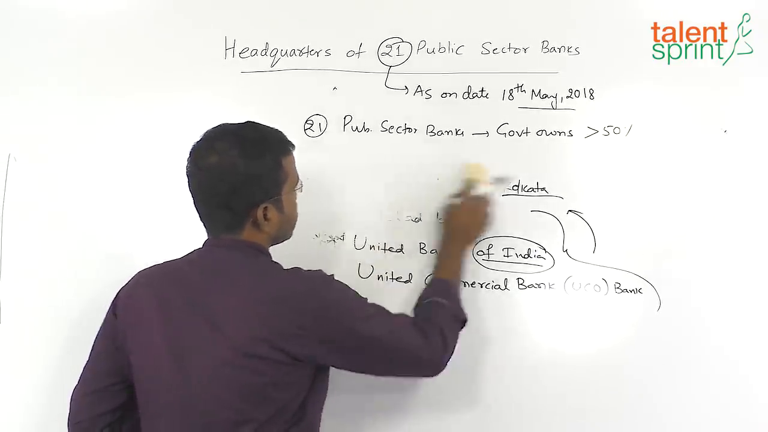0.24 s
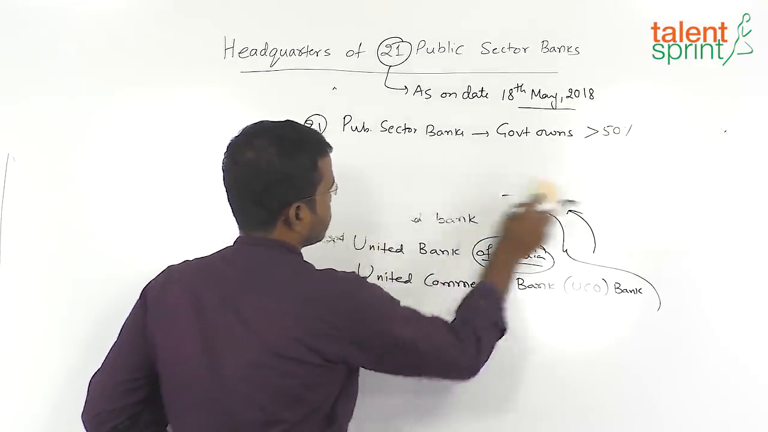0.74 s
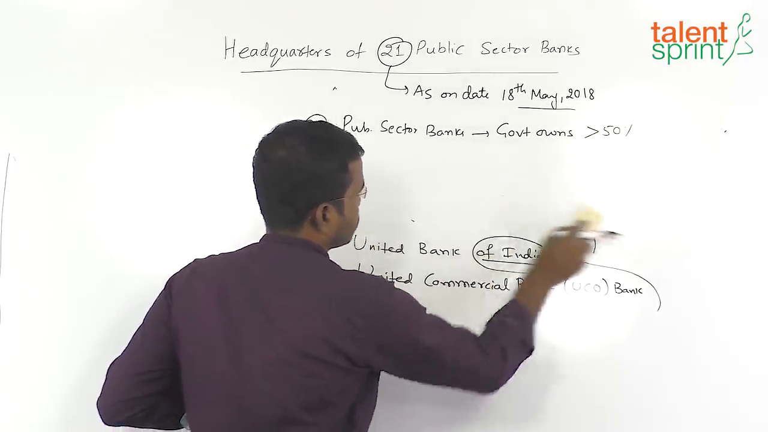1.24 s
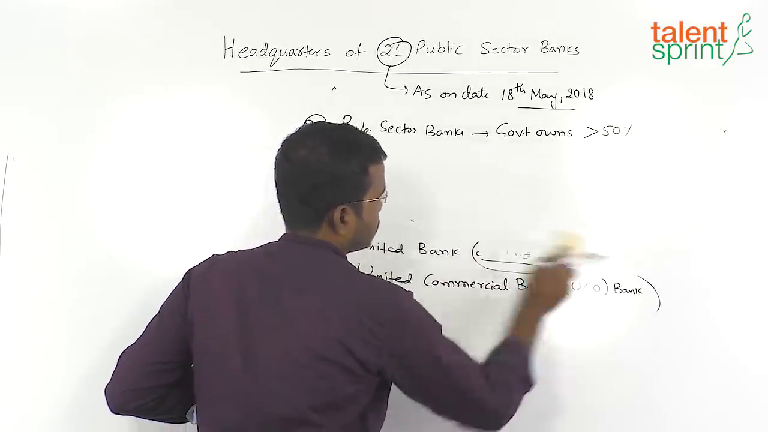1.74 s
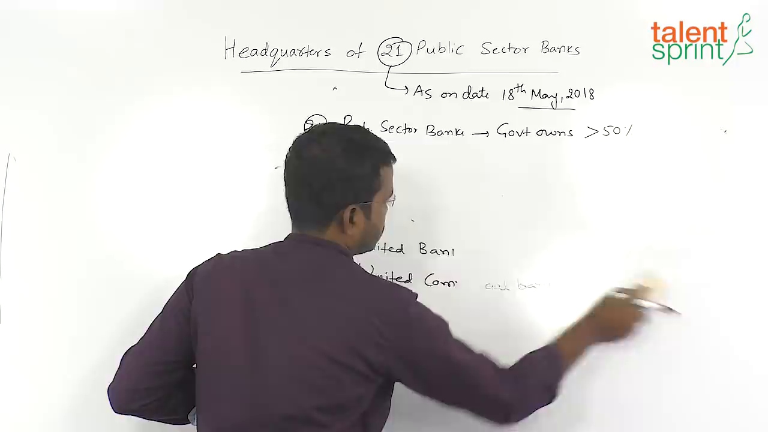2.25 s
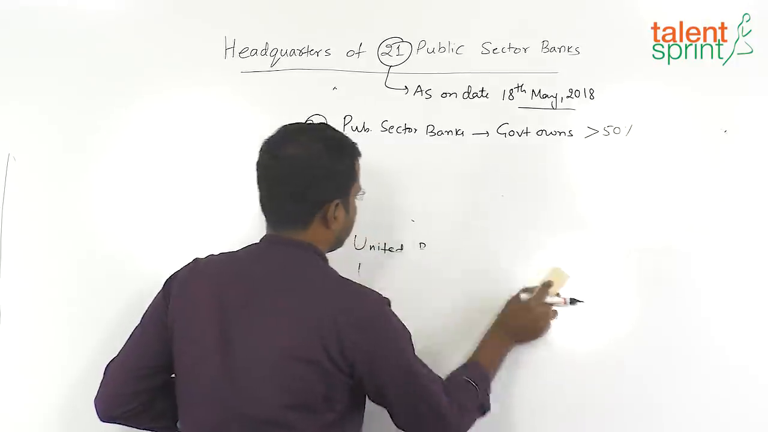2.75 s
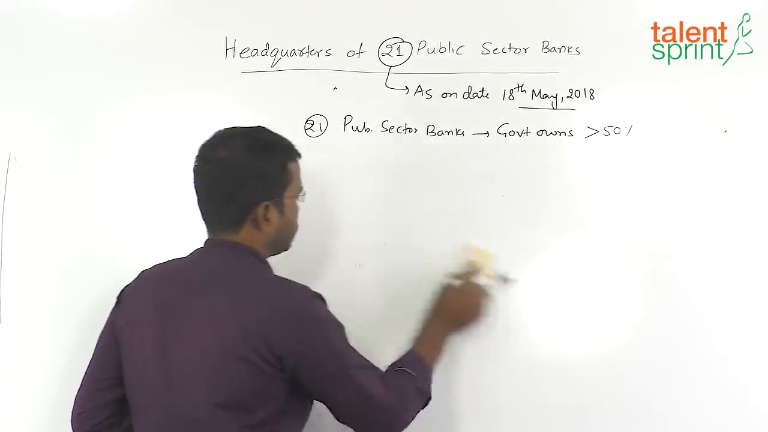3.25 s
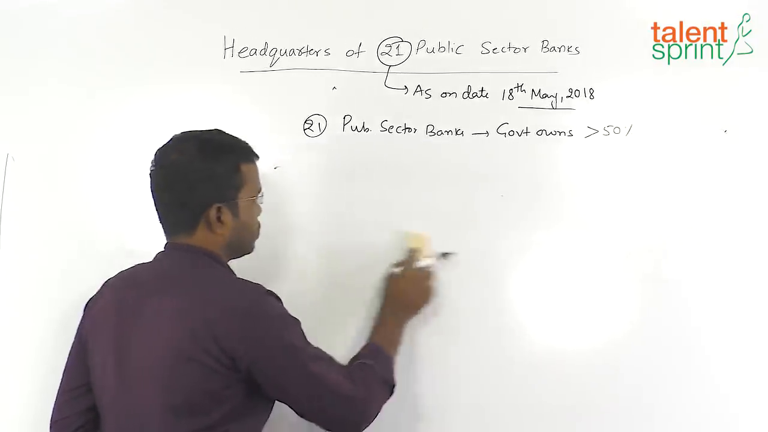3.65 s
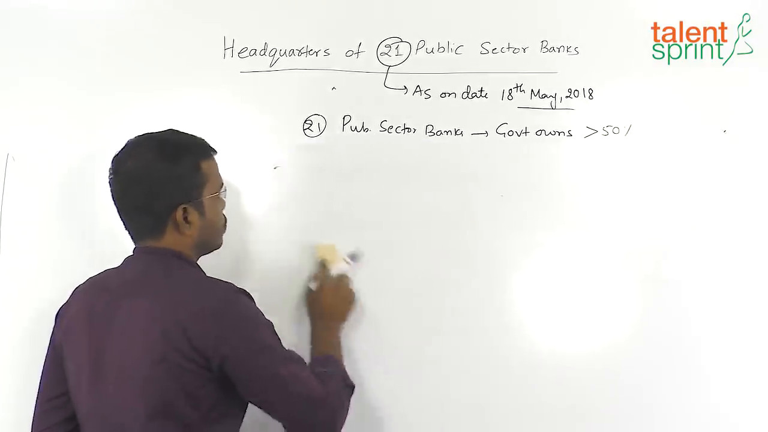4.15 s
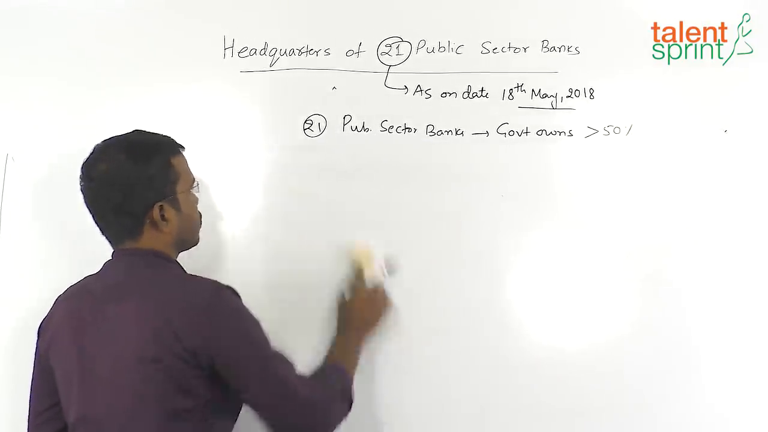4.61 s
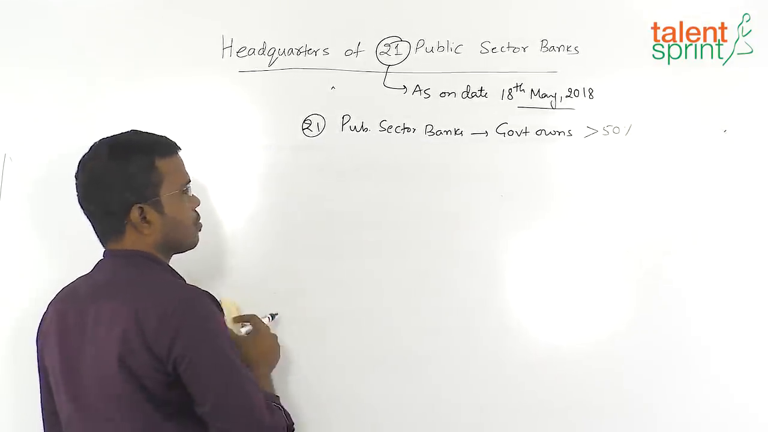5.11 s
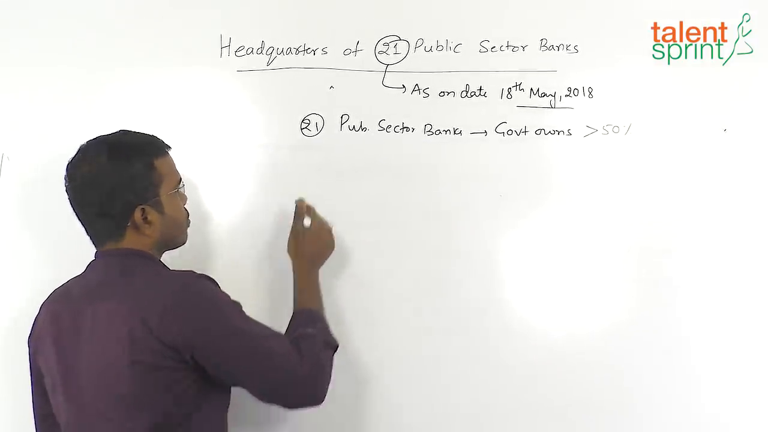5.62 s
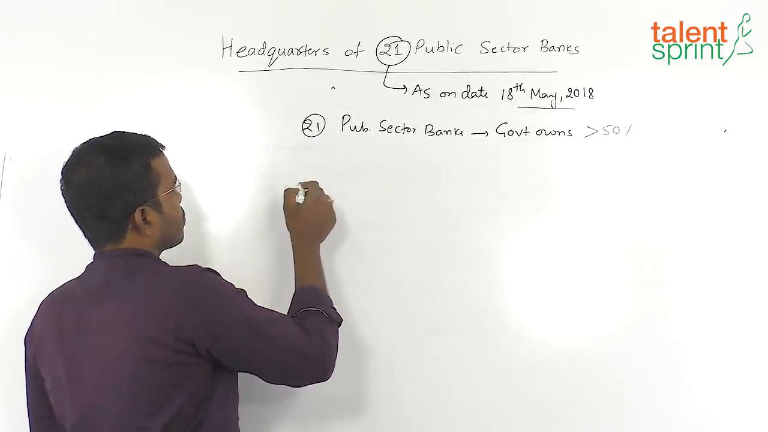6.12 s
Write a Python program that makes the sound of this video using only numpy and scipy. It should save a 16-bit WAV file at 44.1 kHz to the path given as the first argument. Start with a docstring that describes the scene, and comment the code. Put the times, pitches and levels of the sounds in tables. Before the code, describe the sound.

Quick hissing strokes wipe a whiteboard, then a brief rustle follows, over a fan's low rush and soft thumps from a draught.

```python
"""Wiping a classroom whiteboard

A felt eraser hisses back and forth over the board, stopping for an instant at each turn. It is laid
aside with a rustle and a tick, and a marker starts to write. A draught buffets the close microphone
in dull low bumps; behind it all a fan fills the room."""
import sys
import numpy as np
from scipy import signal
from scipy.fft import rfft, irfft, next_fast_len
from scipy.io import wavfile
from scipy.ndimage import uniform_filter1d, map_coordinates

SR = 44100
rng = np.random.default_rng(int(sys.argv[2]) if len(sys.argv) > 2 else 0)


def put_to_file(sound):
    """Save the sound as 16-bit audio at rate SR, in the file named by the first command-line argument."""
    columns = np.atleast_2d(sound).T  # one column per channel
    safe = np.clip(columns, -1, 1)
    whole_steps = np.round(safe * 32767)
    wavfile.write(sys.argv[1], SR, whole_steps.astype(np.int16))


N = 280917

LIFT_S, LIFT_DB_PER_S = 4.85, 120  # the felt leaves the board
DRIFT_DB, DRIFT_HZ = 1.36, 100  # chance changes of grip
DULL, DULL_S = 0.91, 0.019  # slow felt loses treble first: extra dB per dB of halt, and its reach
RESTART = 1.16  # each halt is this much quicker going in and this much slower coming out
# The eraser block ringing in the hand. Each row: pitch in Hz, width in Hz, relative level in dB.
BLOCK_MODES = [(3020, 1010, 23), (1830, 3600, -36)]
# The grip lets the block ring more or less. Each row: time and half width in seconds, change in dB.
GRIP_PRESSES = [(2.54, .04, 3.5), (3.04, 0.035, 5.5), (3.2, 0.054, -5), (3.1, 0.051, -3.5), (0.46, .03, 7)]
# The bright edge of stiff fibres. Each row: frequency in Hz, relative level in dB.
EDGE_SPECTRUM = [(7000, -7), (8600, -3), (9400, 3), (10600, -2.5), (11100, -29), (13000, -54)]
# The fizz at the top of the hiss. Each row: frequency in Hz, relative level in dB.
FIZZ_SPECTRUM = [(8000, -56), (10800, 2), (11500, 1), (13000, -1), (16000, -6)]
# The hand reversing at the board, near the microphone. Each row: time in seconds, depth of the halt
# in dB, its half width in seconds, hiss level in dB, swell of the next stroke in dB, hiss centre and
# hollow centre in Hz, then block ring, hollow rub, bright edge and fizz in dB relative to the hiss.
HAND_TURNS = [(-.02, 8, .012, -35.5, 1, 7600, 4050, -15, -12, -12, -16),
              (.265, 15, 0.014, -45, -2, 6100, 3700, -2, -24, -8, -17),
              (.463, 9.5, .012, -38, -2, 6500, 3850, -13, -13, -6.5, -15),
              (.75, 16, 0.015, -45.5, -1, 6400, 3670, -11, -8, -7, -15),
              (.99, 10.5, 0.011, -38.5, -0.5, 6300, 4100, -11.5, -14, -11, -15),
              (1.269, 15, 0.023, -44, -1, 6900, 3880, -3, -17, -6, -14),
              (1.482, 6.5, 0.0081, -38.5, 2.5, 6550, 4400, -10.5, -20, -11.5, -17),
              (1.716, 14, 0.019, -46.5, -3.5, 6800, 4200, -5, -10, -5, -15),
              (1.952, 12, 0.0079, -34, 1.5, 7200, 4470, -10.5, -16, -15.5, -15),
              (2.253, 11, .013, -47.5, -3, 6800, 4340, -3, -18, -5.5, -14),
              (2.576, 23.5, 0.013, -31, -0.5, 6700, 3930, -11, -9, -11, -11.5),
              (2.829, 8, 0.008, -41.5, 0, 6450, 4500, -10.5, -18, -20.5, -15),
              (3.118, 10.5, 0.025, -36, 2, 7100, 3730, -2, -6, -2, -12),
              (3.37, 22, 0.0071, -45, -0.5, 5800, 4600, -13, -16, -16, -15),
              (3.585, 10.5, 0.014, -33.5, -3.5, 6400, 3850, -12.5, -12, -8, -13),
              (3.772, 25, 0.0059, -42.5, 1.5, 5600, 4850, -13, -10, -10, -11),
              (4.088, 12, .014, -43.5, 1.5, 5950, 4550, -14, -4, -7.5, -9),
              (4.489, 16, 0.013, -42, 5, 6650, 4500, -9.5, -3.5, -9.5, -18),
              (4.87, 4.5, .02, -51.5, -4, 6000, 4530, -10.5, -4, -4.5, -7)]


def eraser():
    """Felt rubs the board; its hiss glides with grip and place and drops as the hand halts at each turn."""
    f, t, slips = grit(rough_db=0.0, patchy_db=1.5)
    turns = np.array(HAND_TURNS)
    gliding = np.delete(turns, [1, 2, 4], axis=1)  # all but the halt and the swell
    hiss_db, centre_hz, hollow_hz, block_db, hollow_db, edge_db, fizz_db = curves(gliding, t)
    stroke = np.interp(t, turns[:, 0], np.arange(len(turns)))
    hiss_db += turns[stroke.astype(int), 4] * np.sin(np.pi * stroke) ** 2
    hiss_db -= LIFT_DB_PER_S * np.clip(t - LIFT_S, 0, None)
    halt_db = sum(db * bump(t, s, width * np.where(t > s, RESTART, 1 / RESTART))
                  for s, db, width in turns[:, :3])
    dull_db = DULL * sum(db * np.exp(-np.abs(t - s) / DULL_S) for s, db in turns[:, :2])
    centre_hz += DRIFT_HZ * wobble(14, t)
    hollow_hz += DRIFT_HZ * wobble(16, t)
    block_db += sum(db * bump(t, s, width) for s, width, db in GRIP_PRESSES)
    block_db += DRIFT_DB * wobble(13, t)
    hollow_db += DRIFT_DB * wobble(12, t)
    # patches smaller than a wavelength radiate little below 5 kHz; soft fibres give little above 9 kHz
    band_loss = 1 + (5000 / (f + 1)) ** 10 + (f / 9000) ** 10
    felt = unit_frames(resonance(f, centre_hz, width_hz=5360) ** 3 / band_loss)
    edge = amp(edge_db) * unit_frames(amp(along(EDGE_SPECTRUM, f)))
    fizz = amp(fizz_db) * unit_frames(amp(along(FIZZ_SPECTRUM, f)))
    hollow = unit_frames(resonance(f, hollow_hz, width_hz=900) ** 2)
    hollow *= np.clip(1.6 - hollow_hz / 5000, 0, 1)  # merges into the hiss as it rises
    low = amp(block_db) * modes(f, BLOCK_MODES) + amp(hollow_db) * hollow
    high = felt + amp(-dull_db) * (edge + fizz)
    # low resonances ring on a little while the felt slows
    return samples(slips * amp(hiss_db) * (amp(-.7 * halt_db) * low + amp(-halt_db) * high))


# Hands and sleeve, close by, as the eraser is laid aside. Each row: start in seconds, level in dB,
# rise, hold and fade in seconds, centre and width in Hz.
SLEEVE_RUSTLES = [(5.105, -45, .001, .008, 0.014, 4500, 9000),
                  (5.109, -43.5, 0.0053, 0.067, 0.0061, 6740, 8000),
                  (5.248, -50, .01, 0.02, 0.0087, 5600, 7000),
                  (5.303, -42.5, 0.01, 0.022, 0.015, 7000, 4100),
                  (5.383, -39, 0.01, 0.0061, 0.0074, 5940, 11200),
                  (5.47, -57, .02, 0.27, 0.083, 6650, 3950),
                  (5.786, -46.5, 0.064, 0.028, 0.052, 2400, 3950),
                  (5.87, -50.5, 0.031, 0.013, 0.0091, 4840, 8000)]


def rustles():
    """Hands and sleeve brush in short, broad scrapes."""
    f, t, slips = grit(rough_db=2.5, patchy_db=1.2)
    gain = 0
    for start, db, rise, hold, fade, hz, width_hz in SLEEVE_RUSTLES:
        attack = np.clip((t - start) / rise, 0, 1)
        release = np.exp(-np.clip(t - start - rise - hold, 0, None) / fade)
        colour = unit_frames(resonance(f, hz, width_hz) ** 2 / (1 + (f / 12000) ** 6))
        gain += amp(db) * attack * release * colour
    return samples(slips * gain)


OPEN_S = 0.0034  # time the cavity takes to open
SNAP_DB, SNAP_T60_S, SNAP_HZ = -0.5, 0.0052, 1600  # the tick that sets it ringing
# The small cavity behind each click. Each row: pitch in Hz, relative level in dB, seconds to fall
# 60 dB, share by which the pitch starts low.
CAVITY_MODES = [(480, -8, .025, 0), (1350, -1, .015, .1), (1980, -2, .02, .1), (3330, -1, .1, .2),
                (3750, -14, .05, .05)]
# Small hard contacts near the microphone. Each row: start in seconds, ring peak in dB, pitch ratio.
HARD_CONTACTS = [(0.2786, -18, 1), (5.112, -30.5, .85)]


def clicks():
    """A sharp tick rings a small cavity whose pitch rises as it opens."""
    out, t = np.zeros(N + SR), np.arange(SR // 5) / SR
    lag = OPEN_S * (1 - np.exp(-t / OPEN_S))
    snap_band = signal.butter(3, [SNAP_HZ / 3, SNAP_HZ * 2], 'band', fs=SR, output='sos')
    for start, db, ratio in HARD_CONTACTS:
        ring = sum(amp(level - 60 * t / t60) * np.sin(2 * np.pi * ratio * hz * (t - flat * lag))
                   for hz, level, t60, flat in CAVITY_MODES)
        snap = unit(signal.sosfilt(snap_band, rng.standard_normal(len(t))))
        snap *= amp(SNAP_DB - 60 * t / SNAP_T60_S)
        out[round(start * SR):][:len(t)] -= amp(db) * (ring / np.abs(ring).max() + snap)
    return out[:N]


MARKER_START_S, MARKER_DB, MARKER_RISE_S = 6.24, -47.5, .04
# The marker's tip on the board. Each row: pitch in Hz, width in Hz, relative level in dB.
TIP_MODES = [(4900, 1100, 3.5), (7300, 1900, 3), (9900, 1000, -7), (13000, 3700, -29)]


def marker():
    """A fibre tip starts its line with a faint, high scrape."""
    f, t, slips = grit(rough_db=2.5, patchy_db=1.2)
    attack = np.clip((t - MARKER_START_S) / MARKER_RISE_S, 0, 1)
    return samples(slips * amp(MARKER_DB) * attack * modes(f, TIP_MODES))


# Slow buffets, swift eddies and flutter, right on the capsule, a spectrum for each.
# Each row: frequency in Hz, relative level in dB.
BUFFET_SPECTRUM = [(3, -25), (8, 7.5), (20, 2), (30, -1), (40, -23.5), (70, -49), (200, -150)]
SWIFT_SPECTRUM = [(10, -88), (20, -36), (34, -4.5), (45, -4.5), (60, -13.5), (80, -31), (140, -97),
                  (400, -150)]
FLUTTER_SPECTRUM = [(20, -90), (40, -30), (60, 0), (80, -1), (120, -6.5), (200, -18), (400, -38),
                    (800, -88), (2000, -150)]
# Air flowing past the microphone. Each row: time in seconds, then buffet, swift and flutter levels in dB.
AIRFLOW = [(0.0, -36, -47, -42.5), (0.83, -36.5, -46, -41.5), (1.19, -34, -47.5, -43),
           (1.61, -28.5, -47, -46.5), (2.48, -32, -43, -44.5), (2.78, -16.5, -49, -41),
           (3.12, -30, -40, -35.5), (3.48, -9, -29, -38.5), (3.78, -25.5, -43.5, -43),
           (5.09, -31.5, -39, -42.5), (5.29, -9.5, -11.5, -44), (5.45, -21.5, -35, -36.5),
           (5.91, -35, -45, -40), (6.37, -33, -44, -48)]
# Gusts on top of it. Each row: time and half width in seconds, then the same three levels in dB.
AIR_GUSTS = [(.63, 0.054, -24.5, -54, -55), (1.1, 0.098, -26, -42, -41), (1.661, 0.054, -13, -32, -57),
             (1.98, 0.1, -25, -33, -36), (2.41, 0.038, -32, -34, -27), (2.56, 0.084, -43, -30, -34.5),
             (2.82, 0.038, -21, -25.5, -44), (3.18, 0.059, -15.5, -29, -44), (3.32, 0.063, -12, -13, -30),
             (3.47, 0.066, -5.5, -12.5, -41), (3.622, 0.043, -9, -13, -40), (4.36, 0.075, -23, -29.5, -35),
             (4.58, 0.058, -18.5, -32, -54), (4.651, 0.031, -30, -20.5, -24.5),
             (4.94, 0.012, -43, -47, -34), (5.201, 0.028, -12.5, -4, -38), (5.29, 0.049, -10, -12.5, -32),
             (5.432, 0.033, -2.5, -33, -34), (5.65, 0.035, -11.5, -42, -32), (5.92, 0.051, -23, -48, -38.5),
             (6.3, 0.038, -25, -40, -35.5)]


def draught():
    """Eddies of three sizes push the capsule, swelling in gusts; the biggest swings round off."""
    t = np.arange(N) / SR
    gain = amp(curves(AIRFLOW, t))
    for s, width, *levels_db in AIR_GUSTS:
        gain = np.hypot(gain, amp(levels_db)[:, None] * bump(t, s, width))
    buffet = eddies(BUFFET_SPECTRUM, span_samples=4000)
    swift = eddies(SWIFT_SPECTRUM, span_samples=2000)
    flutter = eddies(FLUTTER_SPECTRUM, span_samples=1200)
    swing = np.sum(gain * [buffet, swift, flutter], axis=0)
    return swing / (1 + np.abs(swing / .85) ** 3) ** (1 / 3)


def eddies(spectrum, span_samples):
    """Turbulent noise with its chance swells partly evened out, so that it follows a gust closely."""
    push = noise(spectrum)
    power = np.abs(uniform_filter1d(push ** 2, size=span_samples))
    return unit(push / (power + .06) ** .35)


FAN_DB = -42
# The fan, heard from all over the classroom. Each row: frequency in Hz, relative level in dB.
FAN_SPECTRUM = [(60, -31), (130, 3.5), (200, -0.5), (350, -3.5), (600, -8), (745, -8.5), (900, -11.5),
                (1400, -13.5), (2000, -15.5), (4000, -21), (8000, -31.5), (12000, -41.5), (15700, -53)]


def fan():
    """A fan moves air in a steady, low rush."""
    return amp(FAN_DB) * noise(FAN_SPECTRUM)


# The classroom walls, farther off. Each row: frequency in Hz, seconds for the echo to fall 60 dB.
WALL_DECAY = [(300, 0.52), (3000, 0.12), (12000, 0.046)]


def room(x):
    """The walls answer after a short delay, and the treble dies first."""
    hz, t, frames = signal.stft(rng.standard_normal(SR // 2), SR, nperseg=256)
    decay = amp(-60 * t / along(WALL_DECAY, hz)[:, None])
    tail = signal.istft(frames * decay, SR, nperseg=256)[1]
    return signal.fftconvolve(np.pad(x, (300, 0)), tail / np.linalg.norm(tail))[:N]


def grit(rough_db, patchy_db):
    """Countless fibre slips of uneven size, with patches of random gain: frequencies, times, frames."""
    slips = rng.standard_normal(N)
    slips *= amp(rough_db * unit(uniform_filter1d(rng.standard_normal(N), size=24)))
    f, t, frames = signal.stft(unit(slips), SR, nperseg=256, noverlap=192)
    patches = uniform_filter1d(rng.standard_normal(frames.shape), size=2, axis=0)
    patches = uniform_filter1d(patches, size=50, axis=1)
    return f[:, None], t, frames * amp(patchy_db * unit(patches))


def samples(frames):
    """Spectral frames back to samples."""
    return signal.istft(frames, SR, nperseg=256, noverlap=192)[1][:N]


def resonance(f, hz, width_hz):
    """Gain of one resonance, 1 at its centre."""
    return np.abs(f * width_hz / (hz * hz - f * f + 1j * f * width_hz + 1e-9))


def modes(f, table):
    """Steep-sided resonances summed into one shape of power 1."""
    return unit_frames(sum(amp(db) * resonance(f, hz, width) ** 2 for hz, width, db in table))


def noise(spectrum):
    """Coloured noise of rms 1."""
    return unit(filtered(rng.standard_normal(N), lambda hz: amp(along(spectrum, hz))))


def filtered(x, response):
    """x through a response given as a function of frequency."""
    size = next_fast_len(N + SR // 2)
    return irfft(rfft(x, size) * response(np.fft.rfftfreq(size, 1 / SR)), size)[..., :N]


def wobble(rate, t):
    """A smooth random curve, rate knots a second."""
    return map_coordinates(rng.standard_normal(int(N * rate / SR) + 8), [np.clip(t, 0, None) * rate])


def bump(t, centre, half_width):
    """A bell curve of height 1."""
    return np.exp(-((t - centre) / half_width) ** 2)


def curves(rows, t):
    """Each column after the time, read at the times t."""
    times, *columns = np.transpose(rows)
    return [np.interp(t, times, column) for column in columns]


def along(points, hz):
    """(Hz, value) points read at hz on a log axis."""
    f, values = np.transpose(points)
    return np.interp(np.log(hz + 1), np.log(f + 1), values)


def amp(db):
    """Gain of a level in dB."""
    return 10 ** (np.asarray(db) / 20)


def unit(x):
    """x at rms 1."""
    return x / np.sqrt(np.mean(x ** 2) + 1e-20)


def unit_frames(shape):
    """A spectral shape at power 1 in every frame."""
    return shape / np.sqrt(np.mean(shape ** 2, axis=0) + 1e-20)


def scene():
    """One microphone close to the board: rubbing and ticks with their echo, over draught and fan."""
    rubbing = eraser() + rustles() + marker()
    ticks = clicks()
    echo = room(amp(-20.5) * rubbing + amp(-6.5) * ticks)
    return (rubbing + ticks + echo + draught() + fan())[None]


TOP_HZ = 15750


def record(dry):
    """The treble ends steeply at the band limit."""
    return filtered(dry, lambda hz: np.clip((TOP_HZ + 80 - hz) / 160, 0, 1) ** 3)


dry = scene()
out = record(dry)
put_to_file(out)
```